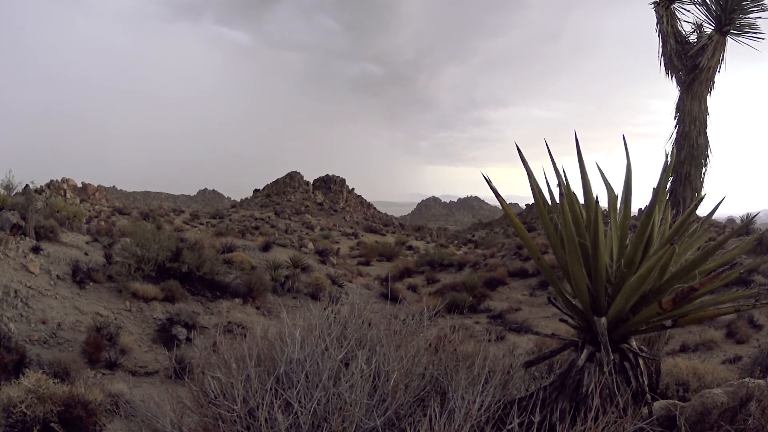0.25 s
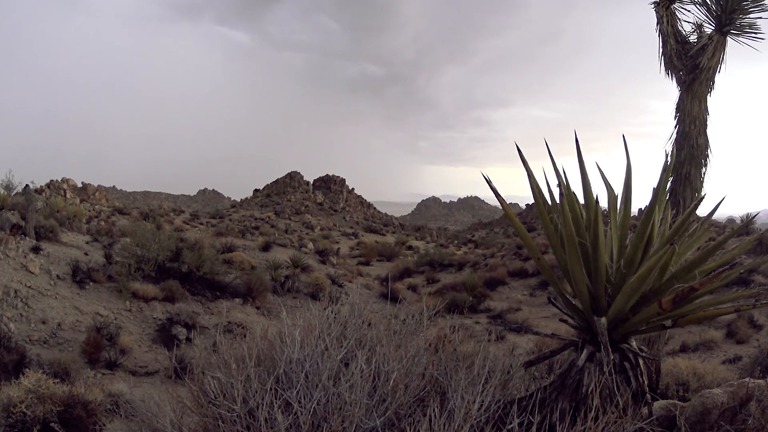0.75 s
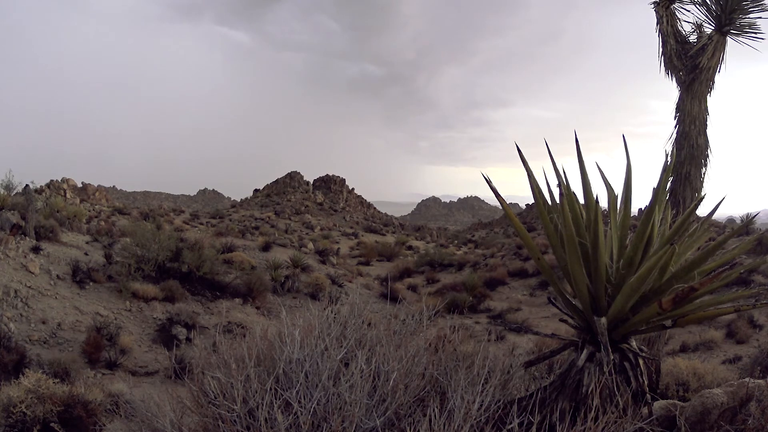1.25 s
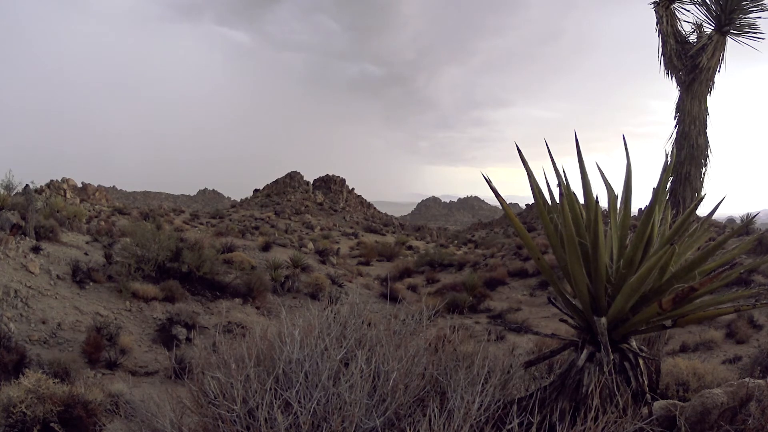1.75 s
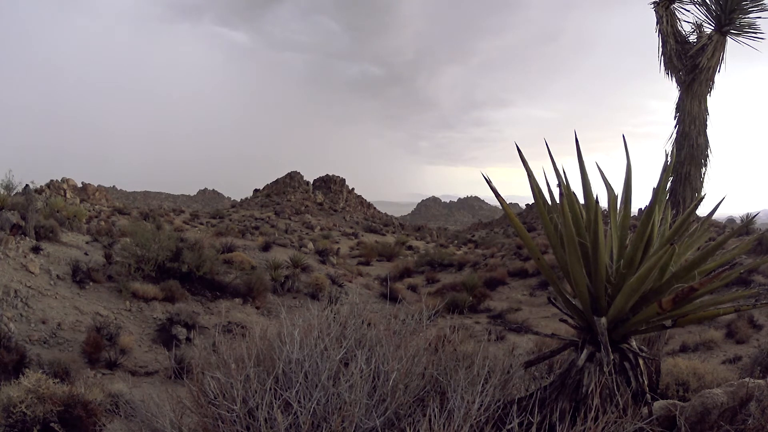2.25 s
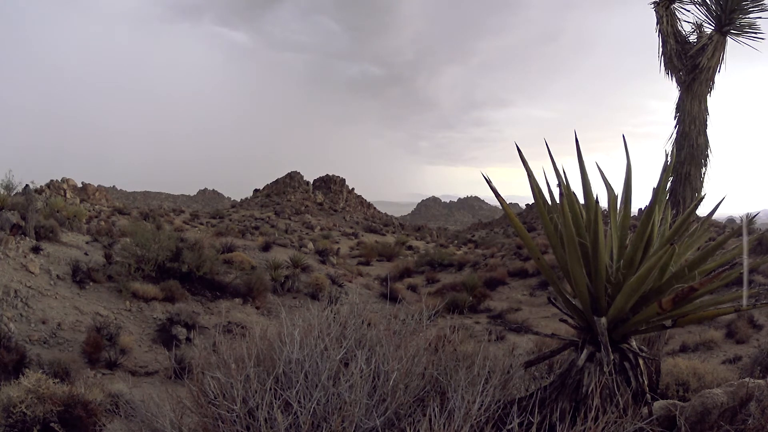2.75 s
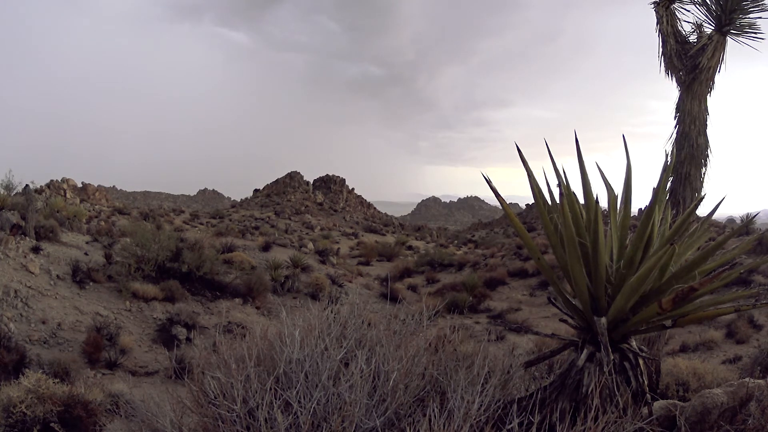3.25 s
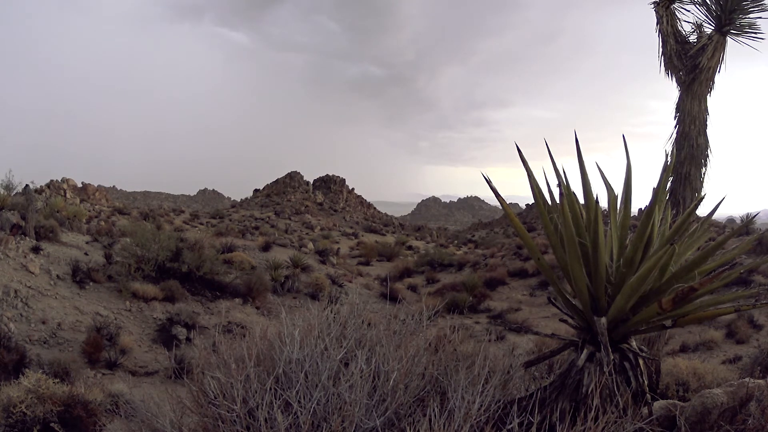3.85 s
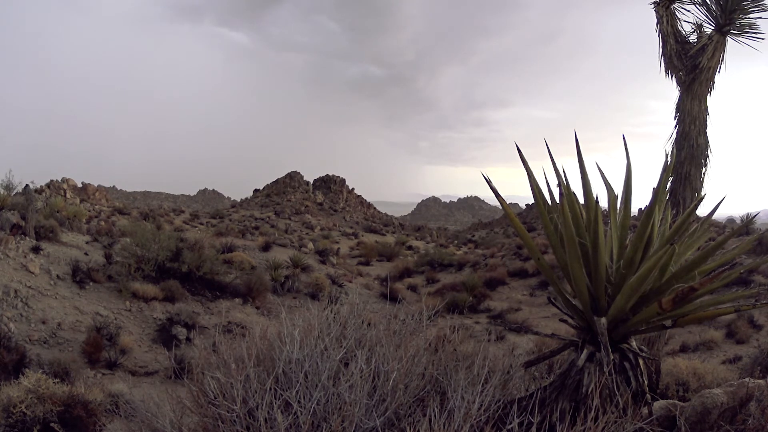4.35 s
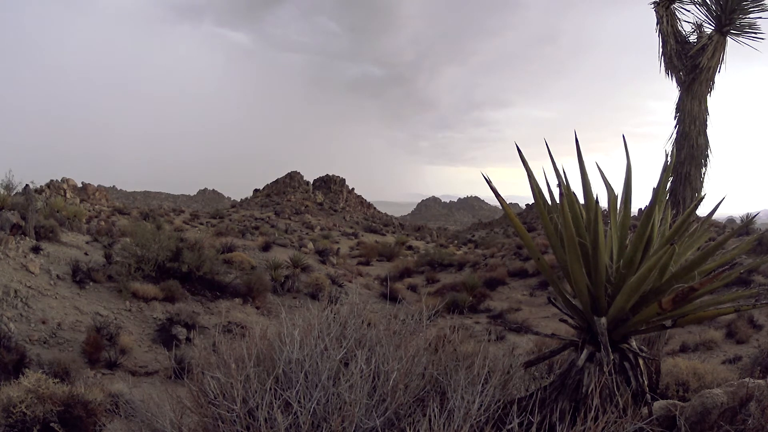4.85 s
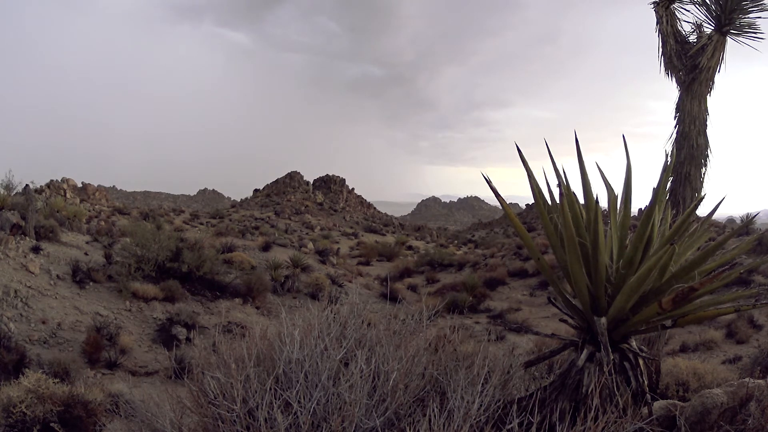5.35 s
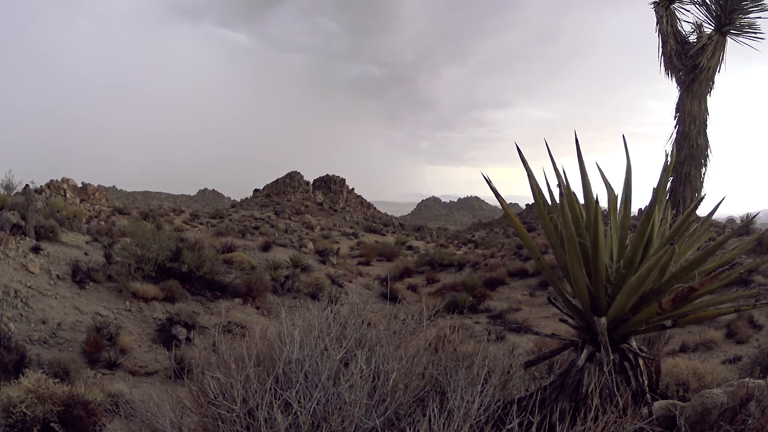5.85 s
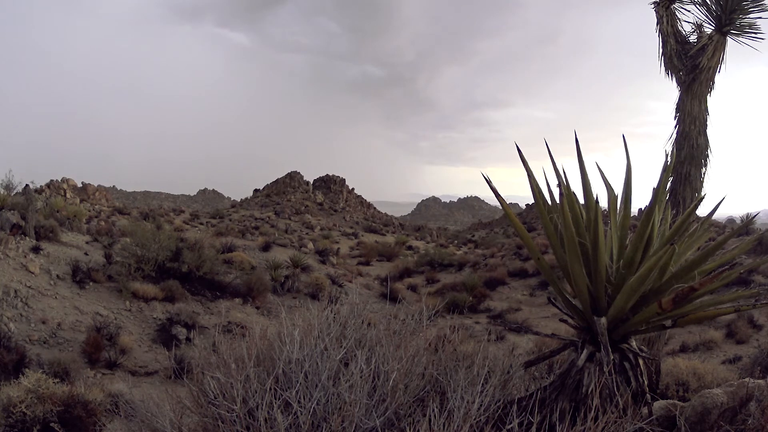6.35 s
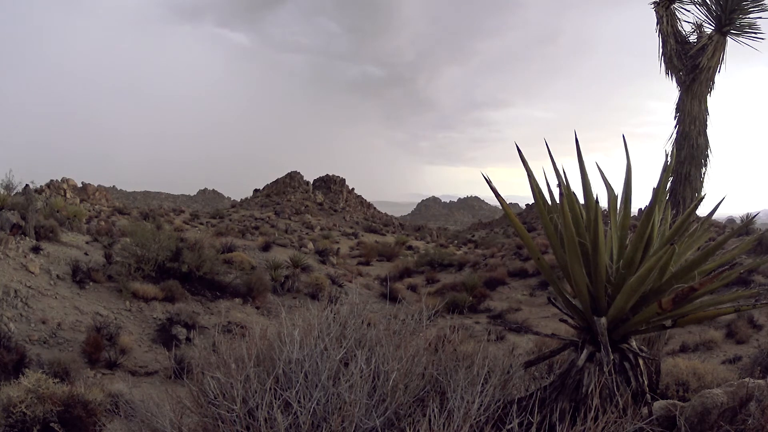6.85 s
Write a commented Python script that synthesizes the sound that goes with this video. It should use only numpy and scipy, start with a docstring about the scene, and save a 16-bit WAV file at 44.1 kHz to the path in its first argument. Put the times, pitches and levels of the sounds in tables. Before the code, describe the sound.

Low gusty wind buffets a microphone in open desert while scattered raindrops tap its housing sharply over a faint, fine rain hiss.

```python
"""Gusts of wind buffet a sheltered stereo microphone in open desert during light rain.
The wind is noise in two broad low bands and a higher roar, each swelling with a table of wind strength.
Single drops tap the microphone's housing: impulses excite its modes, and noise bursts form the splash.
Behind them lies distant rain: a fine steady hiss, with small ticks and pats on brush and sand."""
import sys
import numpy as np
from scipy import signal
from scipy.fft import rfft, irfft, next_fast_len
from scipy.io import wavfile
from scipy.ndimage import uniform_filter1d

SR = 44100
rng = np.random.default_rng(int(sys.argv[2]) if len(sys.argv) > 2 else 0)


def inscribe(sig):
    """Save sig as 16-bit PCM at rate SR to the path in sys.argv[1].

    A 1-D sig is mono; a 2-D sig holds one channel per row.
    Samples are clipped to [-1, 1] before scaling.
    """
    pcm = np.round(np.clip(np.atleast_2d(sig).T, -1, 1) * 32767)
    wavfile.write(sys.argv[1], SR, pcm.astype(np.int16))


N = 313231  # length [samples]
EDGE_HZ = 16000  # upper band limit of the whole sound
TAPS = 2048  # length of one hit [samples]
HZ = np.fft.rfftfreq(TAPS, 1 / SR)
AGE = np.arange(TAPS) / SR  # time since impact [s]


def amp(db):
    """Level to amplitude: 20 dB is a factor of ten."""
    return 10 ** (np.asarray(db) / 20)


def evened(x):
    """Power normalisation: scales to rms 1."""
    return x / np.sqrt(np.mean(x ** 2) + 1e-20)


def struck(x, size=220):
    """Onset normalisation: scales a hit to rms 1 over its first samples (5 ms by default)."""
    return x / np.sqrt(np.mean(x[..., :size] ** 2) + 1e-20)


def read(points, hz):
    """Logarithmic frequency scale: interpolates a table along it."""
    f, value = np.transpose(points)
    return np.interp(np.log(hz + 1), np.log(f + 1), value)


def sides(db):
    """Interchannel level difference: left and right gains, positive towards the left."""
    gains = amp([[db / 2], [-db / 2]])
    return evened(gains)


def add(mix, s, sound):
    """Linear superposition: adds a stereo sound at time s."""
    part = mix[:, max(round(s * SR), 0):][:, :sound.shape[1]]
    part += sound[:, :part.shape[1]]


def delayed(x, s):
    """Time delay: the same stereo hit, s seconds later."""
    return np.pad(x, ((0, 0), (int(abs(s) * SR), 0)))[:, :TAPS]


def causal(db):
    """Minimum phase: the impulse with this spectrum whose energy comes earliest."""
    log_gain = np.log(amp(np.concatenate([db, db[-2:0:-1]])))
    min_phase_spectrum = np.exp(np.conj(signal.hilbert(log_gain)))
    return np.fft.ifft(min_phase_spectrum).real


def ripple(size=24):
    """Random spectral colouration: chance peaks and dips of rms 1, so that no two hits sound alike."""
    smooth = uniform_filter1d(rng.standard_normal(len(HZ)), size)
    return evened(uniform_filter1d(smooth, size))


def wander(rate_hz):
    """Band-limited random modulation: slow noise of rms 1, moving up to about the given rate."""
    size = next_fast_len(N)
    hz = np.fft.rfftfreq(size, 1 / SR)
    slow = rfft(rng.standard_normal(size)) / (1 + (hz / rate_hz) ** 4)
    return evened(irfft(slow, size)[:N])


def noise_pair(spectrum, likeness, lead=((1, 0), (2, 0))):
    """Partial coherence: coloured noise at two ports, partly shared, the left one leading in phase."""
    size = next_fast_len(N)
    hz = np.fft.rfftfreq(size, 1 / SR)
    left, other = rfft(rng.standard_normal((2, size)))
    same = np.clip(read(likeness, hz), -.99, .99)
    right = same * left + np.sqrt(1 - same ** 2) * other
    right = right * np.exp(-1j * read(lead, hz))
    return irfft(np.array([left, right]) * amp(read(spectrum, hz)), size)[:, :N]


def low_pass(x, hz):
    """Linear-phase filtering: a steep low-pass on both channels."""
    kernel = signal.firwin(511, hz, window=("kaiser", 9), fs=SR)
    return signal.oaconvolve(x, kernel[None], "same")


# Wind strength, rising and falling in gusts: (time [s], level [dB])
GUST_STRENGTH = [(0.0, -53), (0.44, -41.5), (0.79, -48.5), (0.87, -43.0), (1.26, -45.5), (2.12, -37),
                 (3.03, -40), (3.08, -37.0), (3.43, -39.5), (3.52, -43.0), (3.97, -48.5), (4.01, -42),
                 (4.26, -51.5), (4.76, -53.5), (4.8, -46.5), (5.09, -45.0), (5.56, -55), (5.61, -50),
                 (5.75, -51.5), (5.78, -66), (6.04, -48.5), (6.07, -56.5), (6.31, -67.5), (6.64, -65),
                 (6.78, -62.5), (6.83, -45), (6.99, -45.0), (7.1, -63)]
# Relative spectra of the low buffeting, the rush and the roar: (frequency [Hz], density [dB per Hz])
BUFFET_SPECTRUM = [(22, -33), (42, -39), (65, -13.5), (100, -1), (135, 2), (180, -2), (215, -11),
                   (255, -24.5), (340, -36.5), (700, -68.5), (5000, -140)]
RUSH_SPECTRUM = [(130, -37), (215, -15.5), (260, -14.5), (320, -3.5), (410, 1), (500, -3.5), (600, -11.5),
                 (750, -22.5), (1000, -38.5), (2600, -51.5), (6000, -120)]
ROAR_SPECTRUM = [(400, -22), (650, 8), (850, 0), (1200, -6), (2500, -34.5), (3500, -38), (6000, -93)]
GUST_REF_DB = -45  # strength of a middling gust
# level at a middling gust [dB], and its rise [dB per dB of wind strength]
BUFFET_DB, BUFFET_FOLLOW = -44, 0.54
ROAR_DB, ROAR_FOLLOW = -75, 1.65
RUSH_DB = -49.5  # the rush follows the wind strength dB for dB
STALL_DB, STALL_WIDTH_DB = -65.5, 1.0  # wind strength below which the flow dies down
LUMP_DB, LUMP_HZ = 1.5, 8  # rms depth and rate of the lumps in the buffeting
FLUTTER_DB, FLUTTER_HZ = 1.63, 8.3  # the same for the flutter of the rush


def wind():
    """Flow noise: low buffeting, a hollow rush and a higher roar grow at different rates with the wind."""
    gust_db = np.interp(np.arange(N) / SR, *np.transpose(GUST_STRENGTH))
    excess_db = gust_db - GUST_REF_DB
    flowing = 1 / (1 + np.exp((STALL_DB - gust_db) / STALL_WIDTH_DB))
    buffet_db = BUFFET_DB + BUFFET_FOLLOW * excess_db + LUMP_DB * wander(LUMP_HZ)
    buffet = turbulence(BUFFET_SPECTRUM, buffet_db, eddy_db=0.6, eddy_hz=25)
    rush_db = RUSH_DB + excess_db + FLUTTER_DB * wander(FLUTTER_HZ)
    rush = turbulence(RUSH_SPECTRUM, rush_db, eddy_db=1.77, eddy_hz=29.2)
    roar_db = ROAR_DB + ROAR_FOLLOW * excess_db
    roar = turbulence(ROAR_SPECTRUM, roar_db, eddy_db=1.5, eddy_hz=50)
    return buffet * np.sqrt(flowing) * sides(0.23) + rush * flowing ** 2 + roar


# Left-right correlation of the wind noise: (frequency [Hz], coefficient [share])
WIND_COHERENCE = [(50, 0.88), (230, 0.6), (350, 1), (550, 1), (900, 0.53), (2500, 0.45)]
# Phase by which the left port hears the wind earlier: (frequency [Hz], lead [rad])
WIND_LEAD = [(20, .1), (70, 0.55), (140, 0.57), (260, 1.36), (420, 1.87), (600, 2.06), (900, 1.92),
             (3000, 3.9)]


def turbulence(spectrum, level_db, eddy_db, eddy_hz, size=4400):
    """Amplitude modulation: the gusts set a noise band's slow swell, and quick eddies shake it."""
    air = noise_pair(spectrum, WIND_COHERENCE, WIND_LEAD) * amp(eddy_db * wander(eddy_hz))
    power = uniform_filter1d(air.mean(0) ** 2, size)  # size is about 0.1 s
    swell = np.sqrt(uniform_filter1d(power, size // 2) + 1e-20)
    return air / swell * amp(level_db)


# Distinct drops, levels before the near gain:
# (time [s], knock level [dB], tone of the struck spot [Hz], splash level [dB])
DISTINCT_DROPS = [(0.0109, -40, 1210, -48.5), (0.2512, -52.5, 2160, -50), (0.3245, -51.5, 1130, -55.5),
                  (0.647, -27.5, 1300, -38.5), (0.882, -50, 1190, -52), (0.934, -44.5, 1520, -60),
                  (1.1285, -50, 1380, -54.5), (1.8406, -54.5, 920, -55), (1.86, -52.5, 1130, -61),
                  (1.892, -44, 1630, -49), (2.127, -41.5, 1510, -62), (2.1801, -51, 1480, -55),
                  (2.4875, -72, 1150, -54), (2.6422, -39, 1250, -42.5), (2.7584, -41, 1620, -49),
                  (3.2807, -36.5, 1130, -53.5), (3.4073, -60, 1070, -53.5), (3.484, -56, 1280, -46),
                  (3.5404, -41, 1220, -51.5), (3.7562, -47, 1270, -57), (4.0673, -53.5, 1160, -54),
                  (4.3926, -51.5, 960, -61), (4.533, -76, 1530, -54), (4.5932, -50.5, 1540, -64),
                  (4.6354, -25.5, 1210, -42.5), (4.9505, -55, 1910, -55), (5.0671, -55.5, 1230, -66),
                  (5.29, -50, 810, -61), (5.3682, -36.5, 970, -40.5), (5.4326, -45, 1760, -56),
                  (5.454, -39.5, 1120, -51), (5.8232, -56, 804, -74), (5.8928, -53, 770, -61),
                  (5.912, -59, 1250, -62), (5.998, -56.5, 900, -66), (6.0268, -42, 1200, -58.5),
                  (6.1851, -65, 1520, -55.5), (6.6985, -52.5, 1660, -58.5), (6.7418, -45.5, 990, -73),
                  (6.8137, -41.5, 1310, -53.5), (6.8372, -58, 1880, -49), (6.9774, -52.5, 910, -72),
                  (7.015, -43.5, 1300, -48), (7.0617, -41, 1230, -55.5)]


def distinct_drops():
    """Discrete impacts: each listed drop strikes the housing at its own time and spot."""
    out = np.zeros((2, N))
    for s, *landing in DISTINCT_DROPS:
        add(out, s, drop(*landing))
    return out


# Light drops; rows are knock level [dB], tone [Hz], splash level [dB], before panning and near gain:
# (typical [row's unit], spread either way [row's unit])
LIGHT_DROPS = [(-66, 7.7), (1151.5, 410), (-61.5, 4.6)]
DRIZZLE_PER_S = 3.2  # mean rate of the light drops
DRIZZLE_PAN_DB = 9  # their mean added shift to the left


def drizzle(scatter_db=5, count=64):
    """Irregular arrivals: light drops reach the housing at uneven intervals, each on its own spot."""
    out = np.zeros((2, N))
    middle, spread = np.transpose(LIGHT_DROPS)
    for k, (when, side, *chance) in enumerate(rng.uniform(-1, 1, (count, 5))):
        s = (k + .5 + when) / DRIZZLE_PER_S
        if s < N / SR:
            landing = middle + spread * chance
            add(out, s, drop(*landing) * sides(DRIZZLE_PAN_DB + scatter_db * side))
    return out


CENTRE_DB, LEAN = -32, 0.23  # drops this strong land mid-housing; lighter ones lean right [dB per dB]


def drop(knock_db, tone_hz, splash_db, ring_db=-9.5, lag_s=.0003):
    """Impact excitation: the splash comes first, then the housing knocks, rocks and rings briefly."""
    tap = amp(knock_db) * struck(knock(tone_hz) + amp(ring_db) * ring(tone_hz))
    pan_db = LEAN * (max(knock_db, splash_db) - CENTRE_DB)
    hit = delayed(tap, lag_s) + amp(splash_db) * splash(knock_db)
    return hit * sides(pan_db) + delayed(sway(knock_db, tone_hz), lag_s)


# Relative spectrum of the knock: (frequency [Hz], level [dB])
KNOCK_SPECTRUM = [(100, -26.5), (350, -7), (750, -5.5), (1100, 4), (1450, 2), (1900, 0), (2600, 2),
                  (3100, -6.5), (4000, -28), (6000, -71)]
# Right port relative to the left for a drop, shaded in the treble: (frequency [Hz], level [dB])
RIGHT_SHADE = [(400, 12), (1100, -1), (2000, 0), (3000, -5.5), (8000, -7.5)]


def knock(tone_hz, tone_db=10, width_octaves=0.79, roughness=0.42):
    """Impulse response: a push coloured by the spot; a fainter repeat at a random short delay roughens it."""
    spot = tone_db * np.exp(-(np.log2(HZ / tone_hz + 1e-300) / width_octaves) ** 2)
    colour = read(KNOCK_SPECTRUM, HZ) + spot + 2 * ripple(size=12)
    push = struck(np.array([causal(colour), causal(colour + read(RIGHT_SHADE, HZ))]))
    return push + roughness * delayed(push, rng.uniform(0.0012, 0.00394))


# Typical modes of the housing: (frequency [Hz], relative level [dB], decay time by 60 dB [s])
HOUSING_MODES = [(496, 2, 0.025), (745, -26, 0.041), (860, -9, 0.052), (1001, -2.5, 0.046),
                 (1130, -8.5, 0.057), (1280, -9, 0.04), (1356, -1, 0.049), (1560, 2, 0.023),
                 (1803, -8.5, 0.044), (2190, -5.5, 0.026), (2340, -10.5, 0.031), (2770, -12.5, 0.038)]


def ring(tone_hz, focus_db=5, rise_s=0.0019):
    """Modal resonance: the landing spot decides how strongly each decaying mode rings at each port."""
    hz, db, t60 = np.transpose(HOUSING_MODES)[:, :, None]
    hz = hz * (1 + 0.022 * rng.standard_normal(hz.shape))
    db = db - focus_db * np.log2(hz / tone_hz) ** 2 + 1.7 * rng.standard_normal(hz.shape)
    db = np.array([db, db + read(RIGHT_SHADE, hz)])
    phase = rng.random((2, len(hz), 1))  # [cycles]
    modes = amp(db - 60 * AGE / t60) * np.sin(2 * np.pi * (hz * AGE + phase))
    return struck(modes.sum(1) * (1 - np.exp(-AGE / rise_s)) ** 2, size=500)


# Relative spectrum of a splash, also of a tick on brush: (frequency [Hz], level [dB])
SPLASH_SPECTRUM = [(2500, -41), (4300, -32), (5300, -14.5), (6600, -3), (8000, 4.5), (9500, 7), (10900, 1),
                   (11700, -18.5), (15500, -43.5)]


def splash(knock_db, heavy=0.45, spray=0.095, spray_s=0.0028):
    """Decaying noise burst: a wet tick and a spray; heavy drops slap lower, light ones fizz higher."""
    droplets = (AGE == 0) + spray * rng.standard_normal((2, TAPS)) * np.exp(-AGE / spray_s)
    # heavy: slope [dB per octave, per dB of knock]
    tilt = -heavy * (knock_db + 53) * np.log2(np.clip(HZ, 5000, 11000) / 8000)
    fizz = read(SPLASH_SPECTRUM, HZ) + tilt + 3 * ripple(size=40)
    burst = np.array([causal(fizz), causal(fizz + read(RIGHT_SHADE, HZ))])
    return struck(signal.fftconvolve(droplets, burst, axes=1)[:, :TAPS])


SWAY_HZ, SWAY_T60_S, SWAY_RISE_S = 940, 0.024, 0.00089  # typical pitch, decay and rise of the mode
# level for a knock of CENTRE_DB on a spot of SWAY_HZ, before the near gain; its rise [dB per dB of knock]
SWAY_DB, SWAY_FOLLOW = -31.5, 0.54
SWAY_DB_PER_OCTAVE = -16  # change as the struck spot gets brighter


def sway(knock_db, tone_hz, detune=0.073):
    """Antisymmetric mode: drops on dull spots rock the two ports in opposition, a short wide pip."""
    hz = SWAY_HZ * (1 + detune * rng.standard_normal())
    dullness_db = SWAY_DB_PER_OCTAVE * np.log2(tone_hz / SWAY_HZ)
    db = SWAY_DB + SWAY_FOLLOW * (knock_db - CENTRE_DB) + dullness_db
    envelope = (1 - np.exp(-AGE / SWAY_RISE_S)) * amp(-60 * AGE / SWAY_T60_S)
    pip = envelope * np.sin(2 * np.pi * hz * AGE)
    return amp(db) * struck(np.array([pip, -pip]))


# Relative spectra of the rain hiss and of soft pats on brush and sand: (frequency [Hz], level [dB])
HISS_SPECTRUM = [(60, 3), (250, -16), (400, -1), (850, 2.5), (1400, -2), (2000, -5), (2800, -12.5),
                 (3600, -31), (4200, -38), (4900, -37.5), (6000, -21), (7500, -14), (9500, -8.5),
                 (11000, -16)]
PAT_SPECTRUM = [(200, -22), (900, -3), (1600, -1.5), (2500, -6.5), (3200, -20.5), (4000, -36.5),
                (6000, -63.5)]
# Left-right correlation of the hiss: (frequency [Hz], coefficient [share])
HISS_COHERENCE = [(100, 0.36), (400, -0.084), (900, -0.53), (2500, -0.4), (5500, 0.34), (11000, 0.049)]
HISS_DB = -61.5  # hiss level before its slow wavering
TOP_HZ = 11120  # upper limit of the steady hiss, ticks and pats as heard


def far_rain():
    """Dense superposition: far drops merge into hiss; those on nearby brush stay ticks and pats."""
    hiss = evened(noise_pair(HISS_SPECTRUM, HISS_COHERENCE)) * amp(0.39 * wander(7.6))
    ticks = amp(-72.0) * patter(SPLASH_SPECTRUM, per_s=240, spread_db=5.0, colour_db=3) * sides(8.5)
    pats = amp(-77.5) * patter(PAT_SPECTRUM, per_s=40, spread_db=-1.0, colour_db=3.5)
    return low_pass(amp(HISS_DB) * hiss + ticks + pats, min(TOP_HZ, EDGE_HZ))


def patter(spectrum, per_s, spread_db, colour_db, count=12, size=300):
    """Random impulse train: uneven small drops on a dozen surfaces, each with its colour and place."""
    out = np.zeros((2, N + size))  # size: candidate drops per surface, and samples per tick
    chance = per_s * N / SR / count / size
    for place in rng.permutation(np.linspace(.1, .9, count)):
        at = rng.integers(0, N, size)
        falls, weight = rng.random((2, size))
        strength = amp(spread_db * np.minimum(-np.log(1 - weight), 3.5)) * (falls < chance)
        scatter = rng.standard_normal((2, TAPS)) * np.exp(-AGE / 0.0017) * 0.25 + (AGE == 0)
        surface = causal(read(spectrum, HZ) + colour_db * ripple())
        tick = evened(signal.fftconvolve(scatter, surface[None])[:, :size])
        for port, share in enumerate([place, 1 - place]):
            hits = np.outer(strength, tick[port]) * np.sqrt(share)
            np.add.at(out[port], at[:, None] + np.arange(size), hits)
    return evened(out[:, :N])


def scene():
    """Superposition of sources: wind, drops that hit the microphone (near gain 0.5 dB) and far rain."""
    near = distinct_drops() + drizzle()
    return wind() + amp(.5) * near + far_rain()


def record(dry):
    """Band limiting: the microphone's low cut at 40 Hz and the upper band limit of the whole sound."""
    low_cut = signal.butter(4, 40, "highpass", fs=SR, output="sos")
    return low_pass(signal.sosfilt(low_cut, dry), EDGE_HZ)


dry = scene()
out = record(dry)
inscribe(out)
```